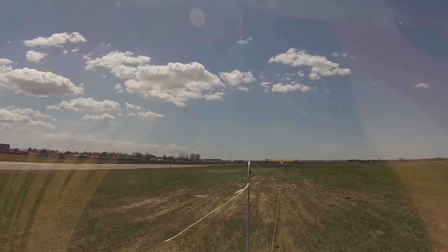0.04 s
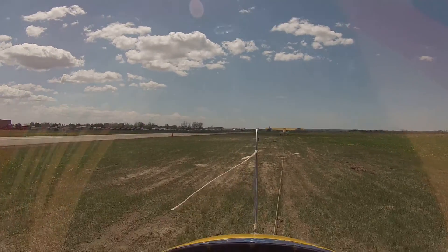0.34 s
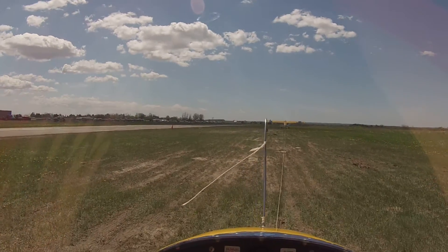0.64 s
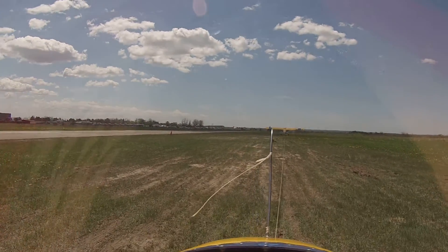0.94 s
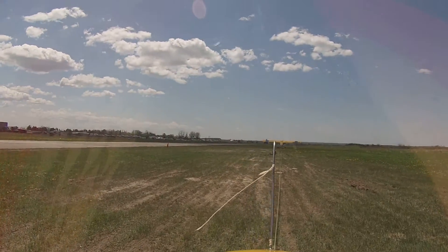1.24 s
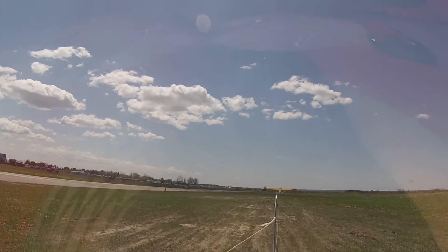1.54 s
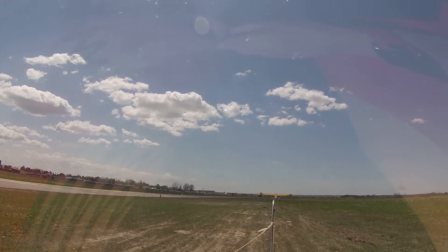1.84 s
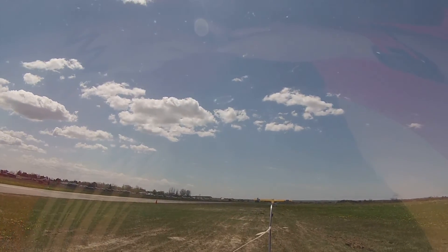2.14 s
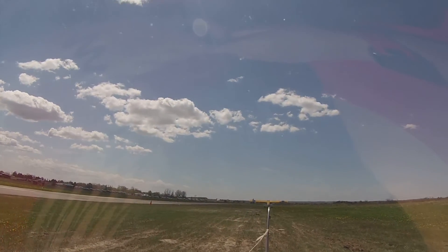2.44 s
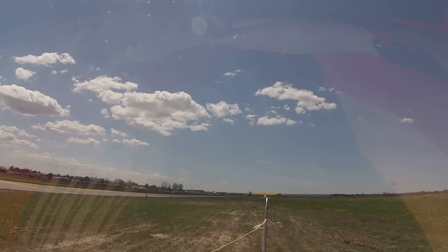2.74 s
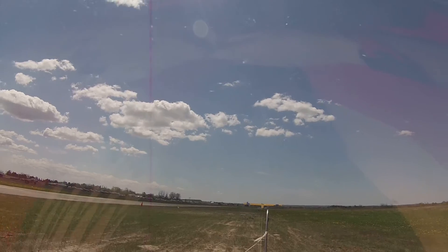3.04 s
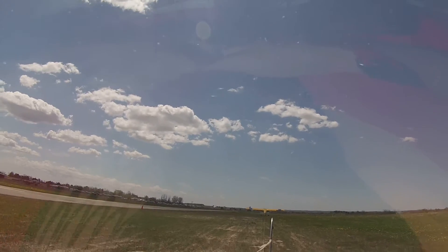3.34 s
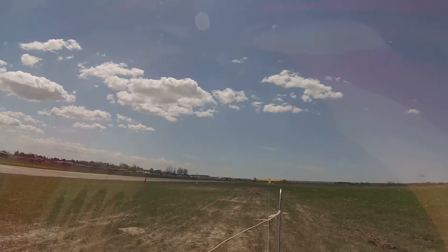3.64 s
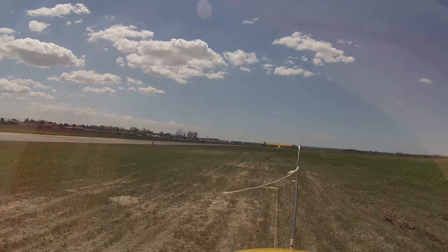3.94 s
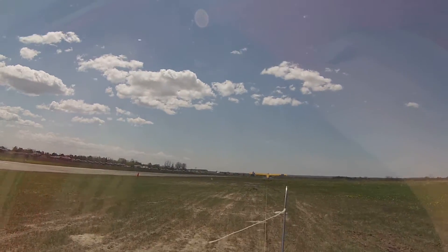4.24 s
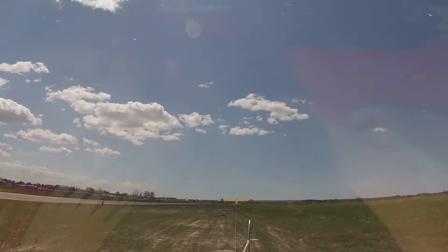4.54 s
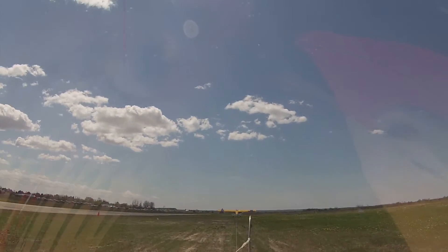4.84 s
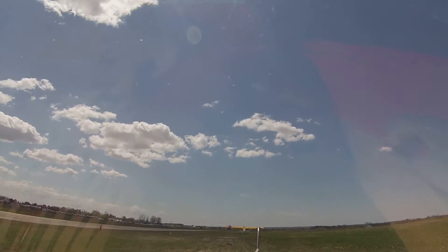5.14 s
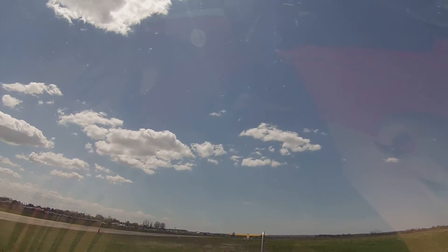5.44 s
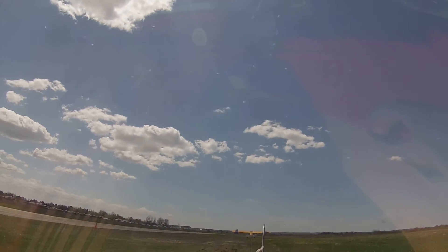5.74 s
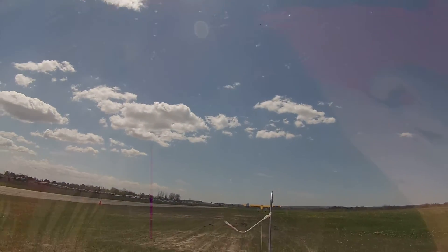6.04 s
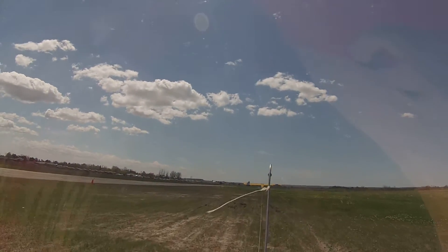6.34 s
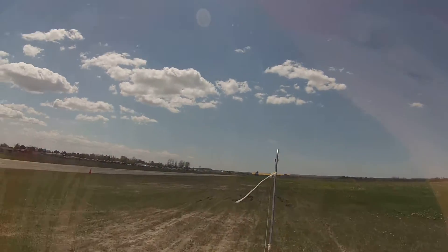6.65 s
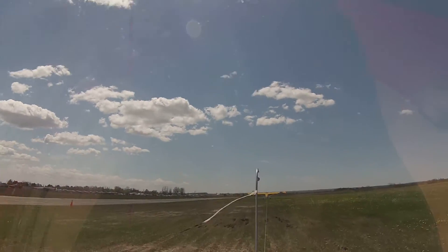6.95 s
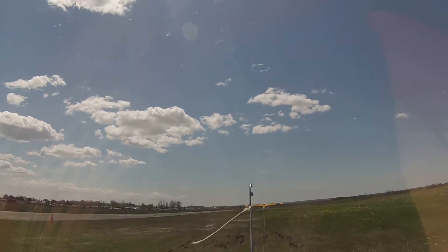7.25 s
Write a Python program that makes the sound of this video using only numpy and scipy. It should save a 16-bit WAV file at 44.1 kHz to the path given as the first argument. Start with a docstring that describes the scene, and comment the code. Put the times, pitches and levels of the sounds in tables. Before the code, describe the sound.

A glider rumbles over grass on tow, heard from the cockpit, with hissing air, rattling fittings, one hard jolt and then thickening bumps.

```python
"""A glider's take-off run on tow over a grass strip, from one microphone inside the closed cockpit.
Air hisses round the canopy; far ahead the tow plane's propeller drones up in pitch. Below, the wheel
rumbles over the turf, the hollow fuselage drums and loose fittings rattle and clink close by.
About 4.5 s in, one hard jolt knocks the hull and the tail tube booms. Then the ride grows rougher
as speed builds, with bumps coming thick and fast."""
import sys
import numpy as np
from scipy import signal
from scipy.fft import rfft, irfft
from scipy.io import wavfile
from scipy.ndimage import uniform_filter1d

SR = 44100
rng = np.random.default_rng(int(sys.argv[2]) if len(sys.argv) > 2 else 0)


def dump_mix(stems):
    """Bounce the given channels to the path in sys.argv[1] as a 16-bit WAV at rate SR."""
    frames = np.atleast_2d(stems).T  # one column per channel
    limited = np.clip(frames, -1, 1)  # hard clip at full scale
    pcm = np.round(limited * 32767).astype(np.int16)
    wavfile.write(sys.argv[1], SR, pcm)


N = 329868
TIME = np.arange(N) / SR
ROUGH_DB = -47  # the ride level that counts as rough

# modes of the hollow fuselage: pitch_hz, t60_s, gain_db
FUSELAGE_MODES = [(150.7, 0.092, -1), (203, 0.13, -2.5), (221, 0.098, -2), (293.2, 0.075, -1),
                  (381, 0.048, -8.5), (570, 0.032, -9.5)]


def undb(db):
    """Decibels to gain."""
    return 10 ** (np.asarray(db) / 20)


def unit(x):
    """Scale to rms 1."""
    return x / np.sqrt(np.mean(x ** 2))


def curves(rows):
    """Each column after the first (time_s) as a line through time."""
    times, *columns = np.transpose(rows)
    return [np.interp(TIME, times, column) for column in columns]


def wander(rate_hz):
    """A slow random drift of rms 1."""
    hold = int(SR / rate_hz)
    steps = np.repeat(rng.standard_normal(N // hold + 1), hold)
    return unit(uniform_filter1d(steps, hold)[:N])


def colour(x, spectrum):
    """Causal filter whose response follows rows of freq_hz, gain_db."""
    hz, db = np.transpose(spectrum)
    bin_hz = np.maximum(np.fft.rfftfreq(2 * N, 1 / SR), 1)
    gain = undb(np.interp(np.log(bin_hz), np.log(hz), db))
    cepstrum = irfft(np.log(gain))[:N]
    cepstrum[1:] *= 2  # minimum phase: nothing sounds ahead of an impact
    return irfft(rfft(x, 2 * N) * np.exp(rfft(cepstrum, 2 * N)))[:N]


def ring(x, modes, sense=-1):
    """Drive decaying modes; neighbours swing in opposite senses, or all in step if sense is 1."""
    t = TIME[:SR // 4]
    response = sum(sense ** k * undb(db - 60 * t / t60) * np.sin(2 * np.pi * hz * t)
                   for k, (hz, t60, db) in enumerate(modes))
    return signal.fftconvolve(x, response)[:N]


def swell(start_s, rise_s):
    """An envelope that rises to 1 in rise_s, then dies away."""
    age = np.clip((TIME - start_s) / rise_s, 0, 20)
    return age * np.exp(1 - age)


def contacts(per_s, spread_db):
    """Random tiny impacts of uneven size."""
    size = undb(spread_db * np.minimum(rng.exponential(size=N), 4))
    hits = rng.random(N) < per_s / SR
    return unit(hits * size * rng.choice([-1, 1], N))


def air(hiss_db=-57.5, whistle_db=-93.5, whistle_hz=5620, whistle_t60_s=0.03):
    """Air flows round the canopy: a smooth, slightly wavering hiss with a faint whistle in it."""
    # spectrum of the airflow: freq_hz, gain_db
    spectrum = [(25, 0), (60, 0), (120, -6.5), (250, -9), (500, -12), (900, -16.5), (1350, -17.5),
                (1700, -19), (2400, -22), (3500, -25), (5200, -28.5), (8500, -34), (11000, -35.5),
                (13000, -41.5), (15000, -42)]
    hiss = unit(colour(rng.standard_normal(N), spectrum))
    whistle = unit(ring(hiss, [(whistle_hz, whistle_t60_s, 0)]))
    return (undb(hiss_db) * hiss + undb(whistle_db) * whistle) * undb(0.52 * wander(6))


def tow_plane(octave_db=-18.5):
    """Far ahead, the propeller's low note climbs as the throttle opens."""
    # the propeller's drone: time_s, blade_rate_hz, level_db
    propeller = [(0, 54.4, -54), (.28, 54.7, -55), (.55, 56.5, -57), (1.4, 59.1, -55), (1.91, 63.3, -53.5),
                 (3.06, 72, -57), (3.86, 77.3, -56), (4.5, 80, -57.5), (7.48, 85, -57.5)]
    blade_hz, level_db = curves(propeller)
    phase = 2 * np.pi * np.cumsum(blade_hz * (1 + .002 * wander(8))) / SR
    drone = np.sin(phase) + undb(octave_db) * np.sin(2 * phase)
    return np.sqrt(2) * undb(level_db + 0.2 * wander(5.4)) * drone


def ride():
    """How hard the turf works the wheel, in dB above a rough ride."""
    # roughness along the run: time_s, level_db
    roughness = [(0.0, -62.5), (0.46, -60.5), (0.81, -62.5), (1.46, -65.5), (3.62, -57.5), (4.4, -55.5),
                 (4.73, -47), (5.25, -53.5), (5.98, -48), (6.15, -44.5), (6.52, -45.5), (6.81, -39),
                 (7.07, -42), (7.33, -40), (7.48, -38.5)]
    return curves(roughness)[0] - ROUGH_DB


def ruts(rise_s=0.041):
    """The envelope of the ruts: each loads the wheel quickly and lets go slowly."""
    # ruts that heave the whole airframe: start_s, level_db
    crossings = [(.19, -51.5), (3.58, -42), (4.0, -47), (4.536, -30.5), (4.82, -47), (5.92, -34.5),
                 (6.14, -35.5), (6.26, -42), (6.64, -35.5), (6.88, -34), (7.24, -29)]
    return sum(undb(db) * swell(start, rise_s) for start, db in crossings)


def wheel(heave_db=-43, tyre_db=-46, rut_tyre_db=-11.5):
    """Under the cockpit, tufts and ruts heave the airframe and bounce the tyre, more on a rough ride."""
    # spectrum of the heaving airframe: freq_hz, gain_db
    heave_spectrum = [(10, -22.5), (20, 2.5), (40, 0.5), (62, -5), (85, -22), (130, -23.5), (300, -78)]
    # spectrum of the bouncing tyre: freq_hz, gain_db
    tyre_spectrum = [(50, -14), (80, -4), (110, 0.5), (130, -3.5), (175, -17.5), (300, -39), (600, -43),
                     (2000, -99)]
    # the tyre bounces less near the end of the run: time_s, change_db
    tyre_ease = [(6.3, 0), (6.42, -2), (7.0, -0.5), (7.08, -3.5)]
    heave = unit(colour(contacts(per_s=910, spread_db=1.5), heave_spectrum))
    tyre = unit(colour(contacts(per_s=1100, spread_db=-3.0), tyre_spectrum))
    ride_db, rut_load = ride(), ruts()
    turf_heave = undb(heave_db + 0.98 * ride_db)
    turf_bounce = undb(tyre_db + 1.34 * ride_db + curves(tyre_ease)[0])
    return heave * np.hypot(turf_heave, rut_load) + tyre * np.hypot(turf_bounce, undb(rut_tyre_db) * rut_load)


def fuselage(drum_db=-56, rut_drum_db=-19):
    """The hollow fuselage drums with the ride and with every rut."""
    drum = unit(ring(contacts(per_s=1200, spread_db=1.0), FUSELAGE_MODES))
    turf_drive = undb(drum_db + 0.77 * ride())
    return drum * np.hypot(turf_drive, undb(rut_drum_db) * ruts())


def shell(impacts, ring_db=1.0):
    """Contacts heard through the cockpit: a dry tick and the ring of the shell."""
    # spectrum of the dry tick: freq_hz, gain_db
    tick_spectrum = [(150, -6.5), (450, 4.5), (700, 3), (1200, 2), (2300, -3), (2750, -10), (5500, -12.5),
                     (8000, -21), (10000, -30), (15000, -42)]
    # modes of the cockpit shell and its fittings: pitch_hz, t60_s, gain_db
    shell_modes = [(1105, 0.048, -3.5), (1274, 0.071, 0), (1384, 0.035, 1), (1463, 0.029, 6.5),
                   (1586, 0.03, -10), (1867, 0.08, -3), (2010, 0.032, -5), (2134, 0.047, 2),
                   (2270, 0.014, 2.5), (2445, 0.061, -4), (3006, 0.041, -12), (3374, 0.051, -6.5),
                   (3680, 0.044, -18.5), (3980, 0.05, -9.5), (4584, 0.02, -10.5), (4790, 0.05, -11),
                   (5560, 0.038, -15.5), (5900, 0.04, -15), (7370, 0.016, -15)]
    tick = unit(colour(impacts, tick_spectrum))
    return unit(tick + undb(ring_db) * unit(ring(impacts, shell_modes)))


def stray_bursts(per_s=8.7, burst_db=-12, rise_s=0.0036):
    """Strength of the rattling: a steady floor with short bursts at uneven intervals."""
    count = np.floor(np.cumsum(per_s * undb(6 * wander(9.9))) / SR)
    onsets = np.diff(count, prepend=0) * undb(1.3 * wander(7.9))
    bursts = signal.fftconvolve(onsets, swell(0, rise_s))[:N]
    return unit(np.hypot(1, undb(burst_db) * unit(bursts)))


def rattle(shake_db=-59.5, loose_at_db=-15, loose_range_db=0.6):
    """Fittings sit still on a gentle ride, come loose on a harder one and buzz in uneven flurries."""
    flurries = contacts(per_s=1000, spread_db=0.2) * undb(1.7 * wander(30)) * stray_bursts()
    ride_db = ride()
    looseness = 1 / (1 + np.exp((loose_at_db - ride_db) / loose_range_db))
    return shell(flurries) * looseness * undb(shake_db + 0.58 * ride_db)


def chatter(focus_db_per_octave=5.5, floor_db=-22):
    """Close by, single fittings clatter in short bursts, each strongest round a pitch of its own."""
    # fittings that chatter: start_s, level_db, rise_s, pitch_hz
    fittings = [(.215, -63.5, 0.016, 2200), (0.2815, -52, 0.0013, 2900), (.323, -62, .005, 7500),
                (.536, -61.5, 0.011, 1300), (.585, -67, .018, 2000), (.92, -63.5, .008, 1300),
                (.995, -65, 0.01, 1500), (1.235, -64, .011, 1350), (1.3, -66, .012, 1400),
                (1.395, -67, .012, 2000), (2.48, -66.5, 0.039, 2200), (2.905, -63, .007, 2100),
                (3.02, -65, .025, 1300), (3.2, -62.5, 0.025, 2000), (3.262, -60.5, 0.013, 2200),
                (3.37, -64, .008, 1600), (3.545, -63, .008, 1300), (3.585, -60, 0.0099, 2200),
                (3.645, -59, .005, 1100), (3.672, -59, 0.0094, 2600), (3.768, -54.5, 0.019, 2200),
                (4.03, -59.5, 0.021, 2200), (4.235, -60.5, 0.027, 2000), (4.447, -51.5, 0.01, 1400),
                (4.474, -52.5, 0.011, 3000), (4.505, -59, 0.0084, 5500), (4.553, -41, 0.0077, 1280),
                (4.566, -41.5, 0.007, 1290), (4.58, -42.5, 0.0041, 2020), (4.59, -46, 0.013, 2920),
                (4.664, -54, 0.021, 1520), (4.796, -48, 0.0052, 940), (4.958, -60.5, 0.0095, 5500),
                (5.042, -54.5, 0.016, 2300), (5.1, -63, 0.0087, 3000), (5.185, -57, 0.0092, 3000),
                (5.268, -57, 0.011, 1410), (5.361, -54, 0.014, 2240), (5.41, -59, 0.017, 2400),
                (5.665, -57, 0.017, 3000), (5.925, -54.5, 0.0087, 2400), (5.965, -62, 0.011, 5000),
                (6.015, -55.5, 0.0084, 2400), (6.04, -56.5, 0.0065, 1200), (6.098, -58, 0.0097, 2210),
                (6.163, -57.5, 0.011, 3020), (6.205, -62, 0.0052, 4500), (6.345, -60, .008, 2200),
                (6.388, -52.5, 0.0071, 2300), (6.435, -67, 0.0071, 2400), (6.518, -59, .005, 4000),
                (6.563, -58.5, 0.013, 2200), (6.605, -60, .005, 4500), (6.632, -63, .008, 5500),
                (6.713, -52.5, 0.0058, 2600), (6.803, -66, 0.0061, 5470), (6.884, -50, 0.013, 1100),
                (6.918, -56, 0.01, 2600), (6.939, -49.5, 0.01, 1400), (7.038, -54.5, 0.0088, 4500),
                (7.054, -54, 0.0073, 4000), (7.076, -53, 0.0065, 4200), (7.098, -52.5, 0.0047, 2100),
                (7.21, -53, 0.01, 2200), (7.232, -57.5, 0.0059, 3500), (7.255, -55, 0.024, 1400),
                (7.312, -59, .0036, 8000), (7.436, -57, 0.0018, 8000)]
    clatter = shell(contacts(per_s=3500, spread_db=-1.2), ring_db=-2.5)
    out, size = np.zeros(N), SR // 5
    bin_hz = np.clip(np.fft.rfftfreq(size, 1 / SR), 300, 12000)
    for start, db, rise, hz in fittings:
        span = slice(int(start * SR), int(start * SR) + size)
        octaves_away = np.abs(np.log2(bin_hz / hz))
        focus = undb(np.maximum(-focus_db_per_octave * octaves_away, floor_db))
        burst = irfft(rfft(clatter[span], size) * focus, size)[:len(out[span])]
        out[span] += undb(db) * swell(start, rise)[span] * unit(burst)
    return out


def bumps(sag=0.039):
    """Larger bumps set the airframe swinging for a few cycles; the pitch sags as the load comes off."""
    # bumps that flex the airframe: start_s, level_db, pitch_hz, rise_s
    flexes = [(.222, -48, 55.7, .012), (2.828, -39.5, 48.4, 0.017), (4.45, -34, 29, 0.017),
              (4.492, -28.5, 42.5, 0.021), (4.5513, -27, 114, .003), (4.587, -20.5, 47, 0.0088),
              (4.591, -32, 120, 0.0056), (4.934, -42, 126.4, 0.011), (5.35, -42.5, 135, 0.0053),
              (5.825, -44, 165, 0.013), (5.985, -39, 159, 0.013), (6.049, -31, 77, 0.013),
              (6.1, -44.5, 206, 0.014), (6.17, -34, 72.7, 0.014), (6.286, -34.5, 72, 0.014),
              (6.315, -38, 140, .009), (6.545, -32, 104, 0.011), (6.638, -27, 52, 0.0079),
              (6.648, -43, 218, 0.0097), (6.674, -24, 63, 0.015), (6.747, -30, 50, 0.0055),
              (6.761, -28.5, 116, 0.0077), (6.845, -32, 109.4, 0.019), (6.91, -29.5, 66, 0.01),
              (6.945, -45, 213, 0.0078), (6.96, -21.5, 105.3, 0.012), (7.153, -32.5, 158, 0.012),
              (7.246, -19.5, 33, .012), (7.255, -47.5, 284, 0.018), (7.315, -21.5, 34.2, 0.0096)]
    out = np.zeros(N)
    for start, db, hz, rise in flexes:
        age = np.maximum(TIME - start, 0)
        cycles = hz * (age + sag * rise * np.tanh(age / rise))
        out += undb(db) * swell(start, rise) * np.sin(2 * np.pi * cycles)
    return out


def clinks(rise_s=0.0055):
    """Small metal parts ring briefly, each on one note."""
    # clinks of metal: start_s, level_db, pitch_hz
    notes = [(.236, -65, 3430), (.324, -68, 4700), (3.415, -68, 3330), (3.676, -67, 3700),
             (4.594, -45.5, 3600), (6.713, -53, 1850), (6.717, -52, 1355), (6.801, -59, 4630),
             (6.942, -50, 1071)]
    return sum(undb(db) * swell(start, rise_s) * np.sin(2 * np.pi * hz * (TIME - start))
               for start, db, hz in notes)


def snaps():
    """Quick clusters of tiny hard contacts that do not ring, probably the canopy in its frame."""
    # dry, bright snaps: start_s, level_db, rise_s
    clusters = [(0.2816, -56, 0.00046), (.325, -68, .003), (3.779, -61.5, .005), (4.589, -57, 0.0053),
                (4.798, -64, .003), (4.96, -68, .003), (6.393, -64, .002), (6.806, -64, .002),
                (7.311, -64, .0015)]
    # spectrum of a snap: freq_hz, gain_db
    spectrum = [(500, -20), (2200, 1), (5500, -1), (9000, -10), (14000, -13)]
    crackle = unit(colour(contacts(per_s=6000, spread_db=3.0), spectrum))
    return crackle * sum(undb(db) * swell(start, rise) for start, db, rise in clusters)


def knocks(contact_s=0.00032, leak_hz=330):
    """Short padded blows ring the hull, its modes starting in step; each push's slow part leaks away."""
    # hard knocks on the hull: time_s, level_db
    blows = [(0.2818, -51), (4.5486, -19), (4.5503, -24.5), (4.5655, -38), (4.5735, -35), (4.5796, -38),
             (4.587, -34), (4.7987, -43), (6.943, -43)]
    # modes of the hull under a hard knock: pitch_hz, t60_s, gain_db
    hull_modes = [(320, 0.017, -6), (413, 0.018, 2), (540, .02, -9.5), (1112, 0.013, 2.5), (1270, .022, -8),
                  (1620, 0.016, -5.5), (2100, 0.021, -7)]
    push = sum(undb(db) * np.exp(-(2 * (TIME - at) / contact_s) ** 2) for at, db in blows)
    pulse_area = np.sqrt(np.pi) * SR * contact_s / 2
    leak = signal.butter(1, leak_hz, "high", fs=SR, output="sos")
    return ring(signal.sosfilt(leak, push / pulse_area), hull_modes, sense=1)


def boom(start_s=4.61, level_db=-47, rise_s=0.1):
    """Behind the cockpit, the long hollow tail tube shudders on after the jolt."""
    shudder = unit(ring(contacts(per_s=1600, spread_db=-1.5), FUSELAGE_MODES))
    return undb(level_db) * swell(start_s, rise_s) * shudder


def scene():
    """Everything reaches one microphone behind the canopy."""
    rolling = air() + tow_plane() + wheel() + fuselage()
    jolts = bumps() + knocks() + boom()
    fittings = clinks() + snaps() + rattle() + chatter()
    return (rolling + jolts + fittings)[None]


def record(dry):
    """The sound eases in and out over 5 ms, and the treble above about 15 kHz is cut."""
    ease = np.minimum(np.minimum(TIME, TIME[::-1]) / .005, 1)
    lowpass = signal.ellip(10, .2, 70, 14950, fs=SR, output="sos")
    return signal.sosfilt(lowpass, dry * ease)


dry = scene()
out = record(dry)
dump_mix(out)
```